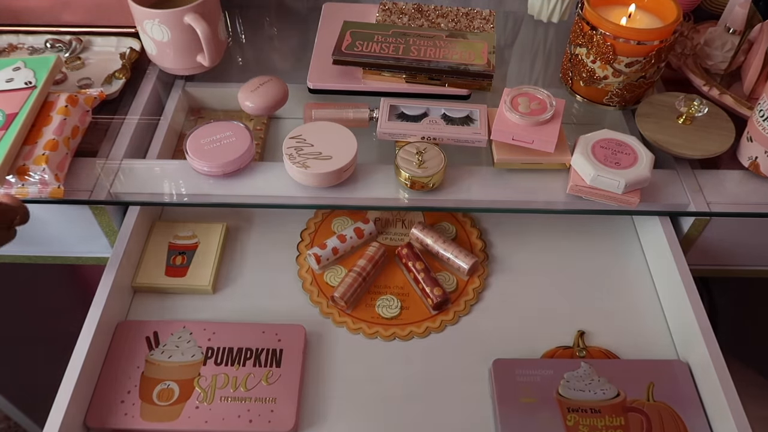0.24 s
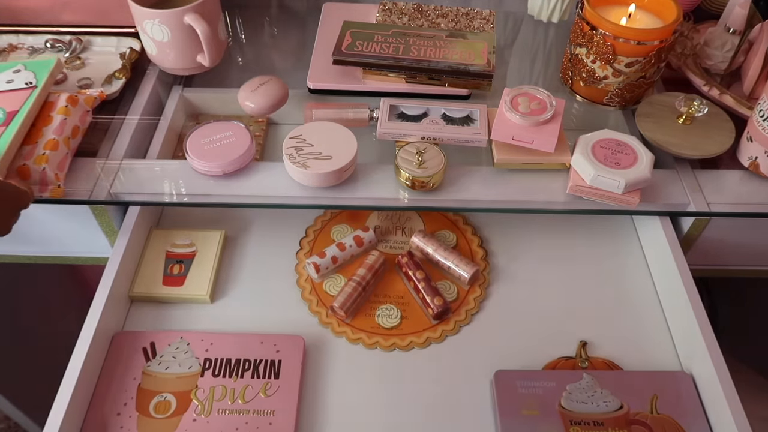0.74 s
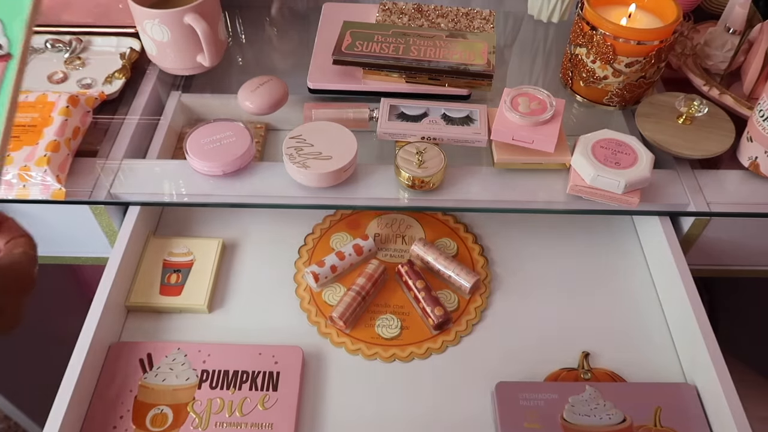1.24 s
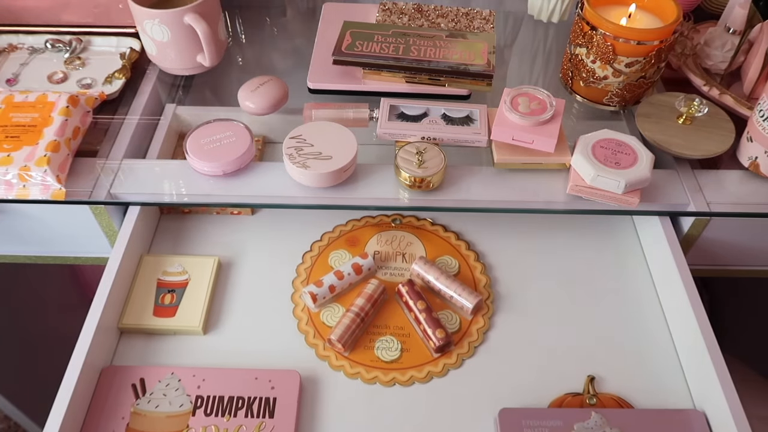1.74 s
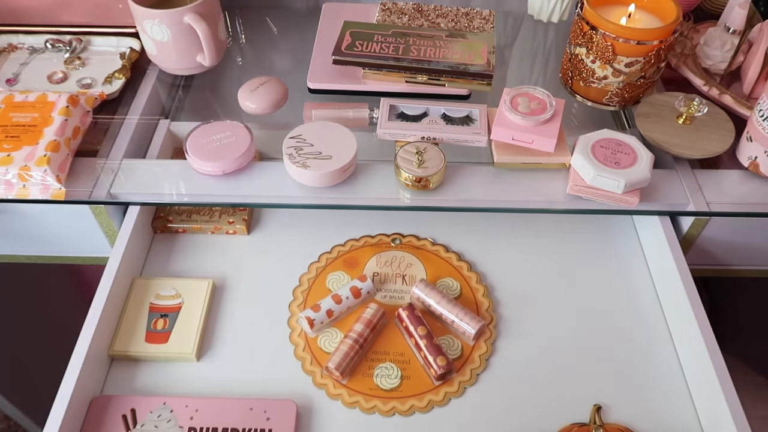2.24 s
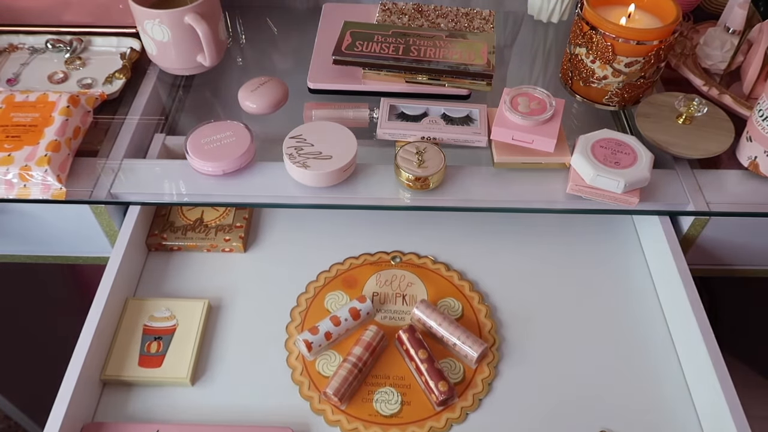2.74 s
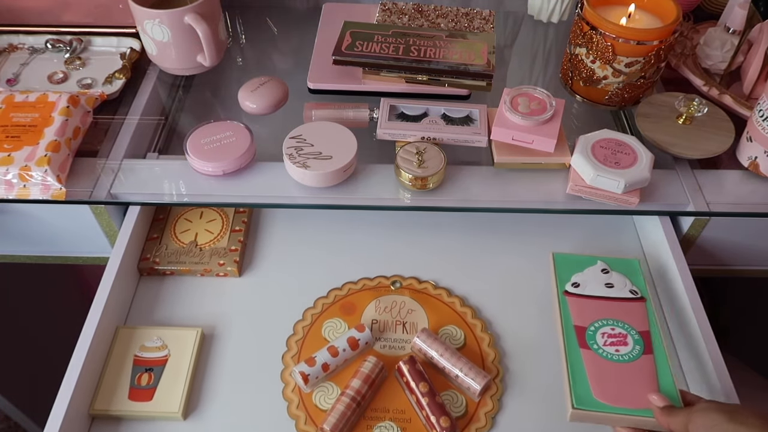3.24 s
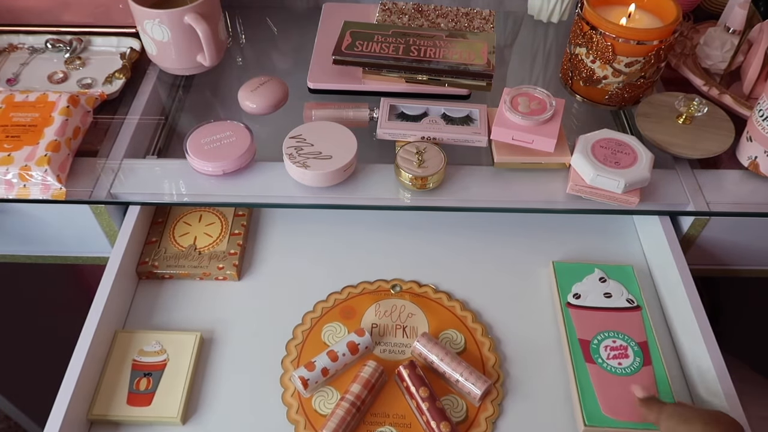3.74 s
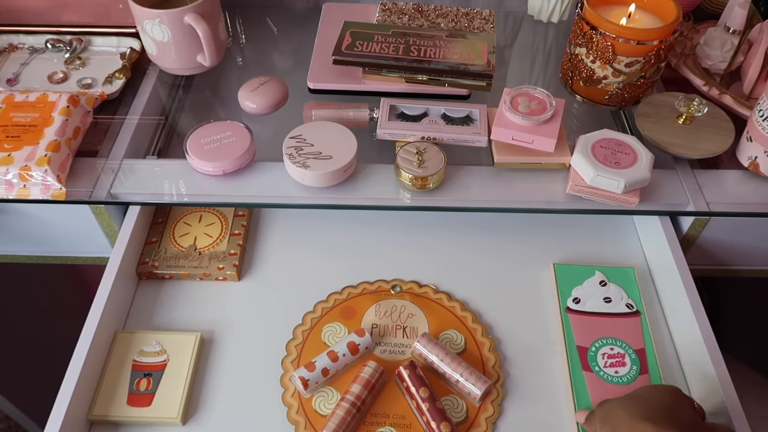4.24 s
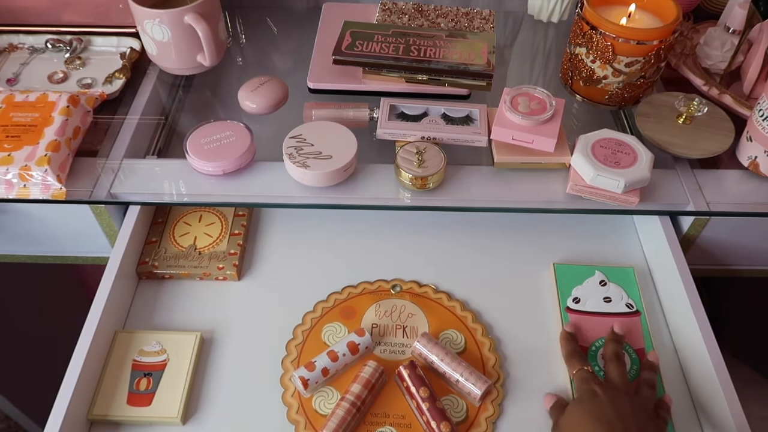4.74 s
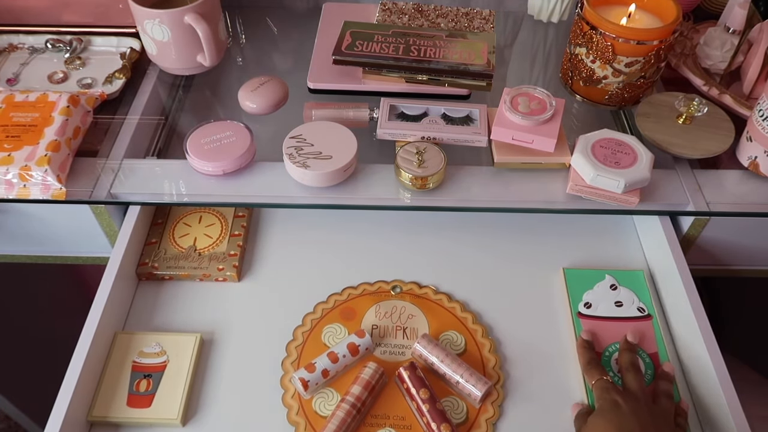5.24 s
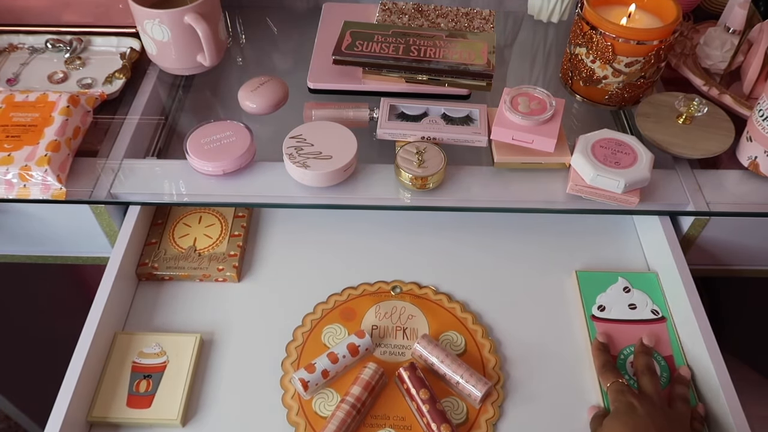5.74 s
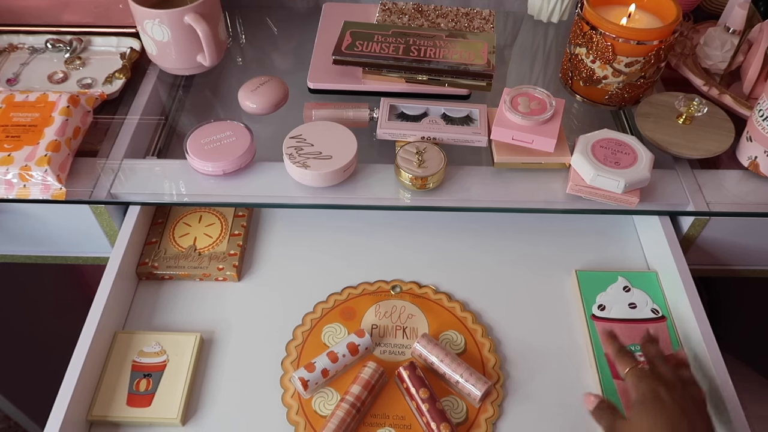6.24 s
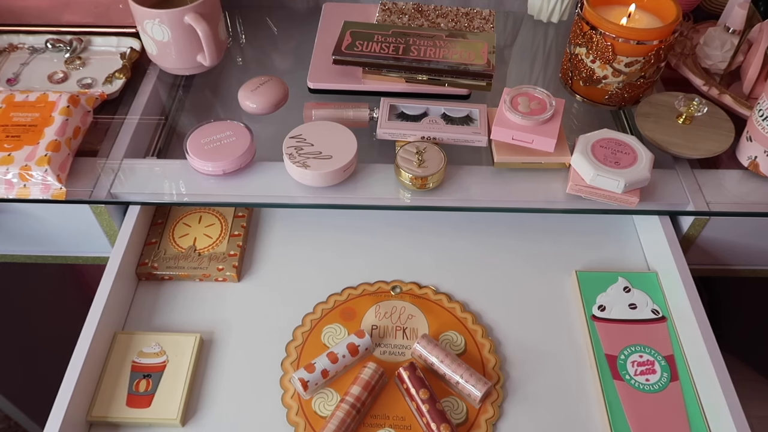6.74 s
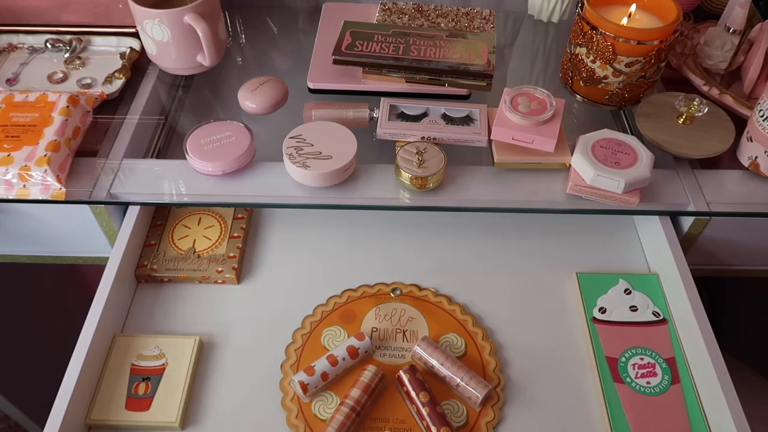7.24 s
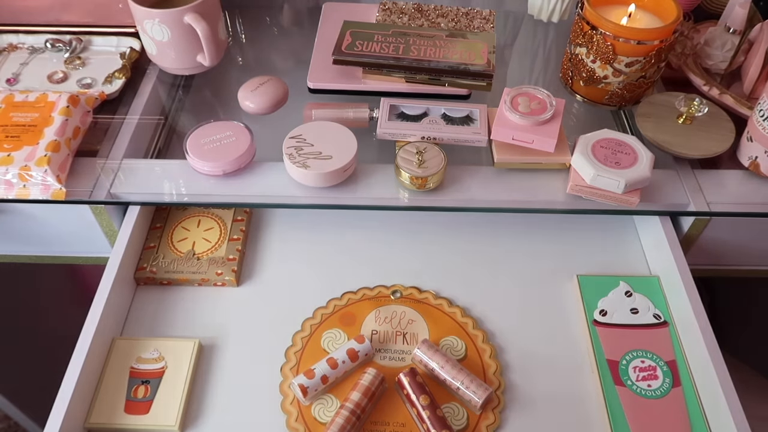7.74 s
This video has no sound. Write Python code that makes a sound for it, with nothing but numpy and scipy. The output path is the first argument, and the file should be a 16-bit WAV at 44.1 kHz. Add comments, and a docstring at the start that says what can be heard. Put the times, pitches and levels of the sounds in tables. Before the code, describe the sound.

Cardboard makeup palettes are set down and slid in a wooden drawer, with light taps, two louder clattering knocks and faint rubbing.

```python
"""Flat cardboard palettes are picked up, set down and pushed about in a wooden drawer.
Each impact excites the bending modes of the thin drawer bottom and cracks at the card's edge; heavy
landings also make the cabinet boom. Between the knocks, sliding fingers and card give friction noise.
The room is quiet and soft, with a low rumble. A small recorder with two close ports clips the
loudest blow and turns its gain down for a moment after it."""
import sys
import numpy as np
from scipy import signal
from scipy.fft import rfft, irfft
from scipy.io import wavfile
from scipy.ndimage import uniform_filter1d, minimum_filter1d

SR = 44100
rng = np.random.default_rng(int(sys.argv[2]) if len(sys.argv) > 2 else 0)


def log_audio(samples):
    """Write samples as a 16-bit WAV file to the path given in sys.argv[1]."""
    # one column per channel
    frames = np.atleast_2d(samples).T
    # limit to full scale, then quantise
    limited = np.clip(frames, -1, 1)
    pcm = np.round(limited * 32767).astype(np.int16)
    wavfile.write(sys.argv[1], SR, pcm)


N = 352396

# Spectral density of the background noise: f/Hz, relative level/dB
BACKGROUND_SPECTRUM = [(12, -38), (20, -10), (76, 1), (136, -6.5), (250, -6), (321, -7.5), (698, -18),
                       (1650, -23), (1840, -23.5), (2500, -26.5), (3900, -30), (5290, -33), (11500, -44),
                       (14000, -44.5), (15200, -64)]
# Correlation of the background between the ports: f/Hz, coefficient
PORT_CORRELATION = [(60, 1), (150, 0.92), (380, 0.099), (940, 0), (2350, 0), (5890, 0.23), (14800, 0.82)]
# Ebb of the low rumble: t/s, relative level/dB
RUMBLE_EBB = [(0, 2), (3.2, 2), (5.001, -1), (7.001, -1.4), (7.99, -4)]
# Strokes of card and fingers: peak t/s, level/dB, time to swell or fade by 10 dB/s, tilt/(dB/octave)
# (times below 0.01 s count as 0.01 s)
STROKES = [(.24, -49, .13, -6.5), (1.19, -64.5, 0.7, -0.5), (1.45, -53, 0.32, -6), (1.85, -67, -0.2, -2),
           (2.24, -50.5, .065, -9), (2.37, -62, 0.06, -2), (2.45, -48.5, 0.1453, -4),
           (2.95, -53, -0.85, -12), (3.93, -57.5, 0.1, 2), (4.1, -66, 0.27, -3), (4.24, -60, 0.68, -6),
           (5.05, -60.5, -0.87, -3.5), (5.39, -57, 0.3, -5.5), (5.63, -49.5, 0.05, -3),
           (6.56, -61, 0.1, -2), (6.95, -58, -0.14, -4), (7.26, -50.5, 0.2, -4.5), (7.63, -52.5, 0.12, -7),
           (7.81, -67.5, 0.5, 6), (7.98, -55, -0.8, -4.5)]
# Spectral density of the friction noise: f/Hz, relative level/dB
FRICTION_SPECTRUM = [(150, -16), (400, -6.5), (1000, -1.5), (1900, 2), (3000, -2), (5000, -5), (14000, -15)]
# Impacts: t/s, peak level/dB, favoured f/Hz, crack level re knock/dB, crack tilt/(dB/octave), rise time/s
IMPACTS = [(1.032, -36.5, 244, -7.5, -5, .0073), (1.169, -28.5, 890, -8.5, 4.5, 0.0031),
           (2.102, -35, 480, -13, 3.5, .0045), (2.117, -29.5, 243, -32, -2, 0.0045),
           (2.287, -34.5, 820, -5, 3, .0017), (2.384, -28, 326, -3, 1, 0.0065),
           (2.4, -28, 640, 1.5, -0.5, 0.00091), (2.479, -42, 290, -0.5, 4, 0.0019),
           (2.740, -35.5, 333, -15, 2, 0.0025), (2.796, -43, 330, -22.5, -6, 0.0033),
           (3.553, -8.5, 430, -4.5, -2, 0.00051), (3.558, -15.5, 330, -14, -0.5, 0.0021),
           (3.566, -15.5, 353, -7.5, 0, 0.00058), (3.753, -8.5, 470, -5, 0.5, 0.00064),
           (3.778, -16.5, 594, -4, 1, 0.0014), (3.803, -21.5, 594, -9, 0.5, 0.0011),
           (3.869, -23.5, 520, 1, 1.5, 0.00019), (4.008, -29, 400, -6, -2.5, 0.00048),
           (4.031, -32, 460, -9, -1, 0.0012), (4.067, -34, 1600, 3.5, 0, .0004),
           (4.278, -30, 480, -3.5, 0, .001), (4.292, -22.5, 889, 6, 4, .0024),
           (4.296, -7, 418, -3, 2, 0.00011), (4.306, 3, 340, -7.5, 1, .0005),
           (4.323, -15, 397, -4, 1, .0009), (4.34, -20.5, 381, -11, 5, .002),
           (4.525, -41.5, 1302, -5, -0.5, .0008), (5.587, -40, 400, -11, 3, 0.018),
           (5.824, -22, 368, -16.5, -2.5, 0.0016), (5.85, -38, 395, -27, 4, 0.0015),
           (6.481, -38, 357, -34, 0, 0.0053), (6.528, -43.5, 393, 2, 2.5, 0.0021),
           (6.705, -26, 230, -15.5, -7.5, 0.013), (6.861, -38.5, 242, -36, 3, .0051),
           (6.941, -33.5, 217, -12.5, -3.5, 0.0091), (6.964, -37, 293, -14, -4, 0.0065),
           (7.158, -39.5, 261, -31, -13, 0.0028), (7.206, -42.5, 298, -8, -8, 0.0025),
           (7.280, -41, 490, -2.5, 4, 0.0052)]
# Modes of the drawer bottom: f/Hz, relative level/dB, T60/s
DRAWER_MODES = [(185, -0.5, 0.13), (260, -11, 0.029), (317, -8.5, 0.085), (373.7, 2, 0.045),
                (463, -9, 0.051), (575, -8.5, 0.038), (642, -14, 0.093), (847, -10, 0.045),
                (943, -10.5, 0.036), (990, -9, 0.012), (1227, -10, 0.045), (1332, -12.5, 0.05),
                (1665, -7, 0.017), (1825, -11.5, 0.026), (1760, -17, .03), (2320, -20.5, 0.028),
                (2900, -11, .03), (3345, -15, .03)]
# Spectral density of the edge crack: f/Hz, relative level/dB
CRACK_SPECTRUM = [(530, -37), (900, -0.5), (1720, -9), (2750, -16), (3530, -18.5), (4160, -25),
                  (4570, -26.5), (11400, -43.5), (15000, -47)]
# Landings whose weight shakes the cabinet: t/s, peak level/dB
LANDINGS = [(3.553, -21), (3.756, -31), (4.295, -24.5), (4.305, -17.5)]
# Difference between the ports: f/Hz, side level re mid/dB
PORT_DIFFERENCE = [(100, -33), (500, -43.5), (1500, -16.5), (4000, -6), (8000, 3), (13000, 6.5)]
# Spectrum returned by the walls: f/Hz, relative level/dB
WALL_SPECTRUM = [(100, 0), (400, -4.5), (1200, 0), (3000, -2), (12000, 2.5)]
# Reverberation time of the room: f/Hz, T60/s
REVERB_TIMES = [(60, 0.37), (250, 0.27), (1000, 0.22), (4000, 0.22), (14000, 0.25)]


def from_db(db):
    """Amplitude ratio of a level in decibels."""
    return 10 ** (np.asarray(db) / 20)


def unit_rms(x):
    """Normalisation to a root mean square of 1."""
    return x / np.sqrt(np.mean(x ** 2) + 1e-20)


def at_hz(table, hz):
    """Interpolation of a table on a logarithmic frequency axis."""
    table_hz, values = np.transpose(table)
    return np.interp(np.log(hz), np.log(table_hz), values)


def drift(corner_hz):
    """Slow random fluctuation: low-passed noise with an rms near 1."""
    step, run_in = 40, 2000
    pole = np.exp(-2 * np.pi * corner_hz * step / SR)
    noise = rng.standard_normal(N // step + run_in + 2)
    slow = signal.lfilter([1], [1, -2 * pole, pole * pole], noise)[run_in:]
    return np.interp(np.arange(N) / step, np.arange(len(slow)), unit_rms(slow))


def resonator(force, hz, t60):
    """Damped harmonic oscillator: a unit impulse starts a decaying sine of amplitude about 1."""
    decay, angle = from_db(-60 / (t60 * SR)), 2 * np.pi * hz / SR
    return signal.lfilter([0, np.sin(angle)], [1, -2 * decay * np.cos(angle), decay ** 2], force + 1e-18)


def bands(pair):
    """Half-octave filter bank: yields (centre f/Hz, band), taking the two input rows in turn."""
    edges = 20 * 2 ** np.arange(0, 10, .5)
    for k, (low, high) in enumerate(zip(edges, edges[1:])):
        bandpass = signal.butter(2, [low, high], "band", fs=SR, output="sos")
        yield np.sqrt(low * high), signal.sosfilt(bandpass, pair[k % 2])


def background_noise():
    """Partial coherence: house rumble and microphone hiss, most alike at the two ports in the bass."""
    level_db, rumble_top_hz = -49, 220
    ebb_db = np.interp(np.arange(N) / SR, *np.transpose(RUMBLE_EBB))
    out = 0
    for hz, (mid, side) in bands(rng.standard_normal((2, 2, N))):
        alike = np.clip(at_hz(PORT_CORRELATION, hz), -1, 1)
        band_db = at_hz(BACKGROUND_SPECTRUM, hz) + 0.82 * drift(12)
        gain = from_db(band_db + ebb_db / (1 + (hz / rumble_top_hz) ** 2))
        out = out + gain * (np.sqrt(1 + alike) * mid + np.sqrt(1 - alike) * side * [[1], [-1]])
    return from_db(level_db) * unit_rms(out)


def card_rubbing():
    """Sliding friction: dense uneven slips of card on paint, coloured by the grip of all strokes, each weighed
    by its loudness."""
    t = np.arange(N) / SR
    envelope, weighted_tilt = np.full(N, 1e-9), np.zeros(N)
    for peak_s, db, fade_s, stroke_tilt in STROKES:
        stroke = from_db(db - 10 * np.abs(t - peak_s) / max(fade_s, .01))
        envelope += stroke
        weighted_tilt += stroke * stroke_tilt
    tilt = weighted_tilt / envelope
    slips = rng.standard_normal((2, N)) * from_db(0.95 * drift(90) + 0.73 * drift(16))
    out, grip_from_hz = 0, 1100
    for hz, band in bands(slips):
        if hz > 150:
            grip_db = tilt * np.log2(max(hz, grip_from_hz) / 2000)
            out = out + from_db(at_hz(FRICTION_SPECTRUM, hz) + grip_db) * band
    return envelope * out


def drawer_bottom(force, favoured_hz, crack_db):
    """Modal superposition: a contact drives most the modes near a pitch set by its size and place."""
    # a padded contact, with little crack, reaches fewer modes
    reach_octaves = min(0.58 * from_db(0.36 * (crack_db + 10)), .75)
    variations = from_db(rng.normal(0, 1.7, len(DRAWER_MODES)))
    vibration = 0
    for (hz, db, t60), variation in zip(DRAWER_MODES, variations):
        weight = from_db(db - 5.3 * (np.log2(hz / favoured_hz) / reach_octaves) ** 2)
        vibration = vibration + weight * variation * resonator(force, hz, t60)
    radiation = signal.butter(2, 334, "high", fs=SR)  # a small panel radiates little deep bass
    return signal.lfilter(*radiation, vibration)


def edge_crack(t, chatter_envelope, rise_s, tilt):
    """Broadband contact transient: a snap, weaker for a softer contact, and then the card's chatter."""
    size, lead = len(t), 64  # the lead leaves room for the filter's pre-ringing
    hz = np.arange(1, size // 2 + 2) * SR / size
    snap = 0.00013 / rise_s * np.exp(-t / 0.00048)
    grit = rng.standard_normal(size) * (chatter_envelope + snap)
    colour = from_db(at_hz(CRACK_SPECTRUM, hz) + tilt * np.log2(hz / 1000))
    crack = irfft(rfft(np.roll(grit, lead)) * colour, size)
    return np.roll(crack, -lead) * (t < .2)


def knocks():
    """Impact excitation: a force pulse and its dying chatter sound the drawer bottom and the edge."""
    longest_settle_s, halved_at_db, span_db = .028, -24.5, 24.5
    size = SR // 4
    t, out = np.arange(size) / SR, np.zeros(N + size)
    for start_s, db, favoured_hz, crack_db, tilt, rise_s in IMPACTS:
        looseness = 1 / (1 + 2 ** ((db - halved_at_db) / span_db))  # a harder blow seats the card sooner
        settle_s = max(longest_settle_s * looseness, .001)
        chatter_envelope = np.exp(-t / settle_s) * (1 - np.exp(-t / rise_s))
        chatter = 0.14 * looseness * rng.standard_normal(size) * chatter_envelope
        pulse = t * np.exp(-t / (.0001 + 0.098 * rise_s))  # soft contacts push longer
        body = drawer_bottom(pulse / pulse.sum() + chatter, favoured_hz, crack_db)
        crack = edge_crack(t, chatter_envelope, rise_s, tilt)
        knock = body / np.abs(body).max() + from_db(crack_db) * crack / np.abs(crack).max()
        start = round(start_s * SR)
        out[start:start + size] += from_db(db) * knock
    return out[:N]


def cabinet_thumps():
    """Resonance: one low cabinet mode booms briefly under heavy landings and radiates little below it."""
    mode_hz, t60_s = 88.6, 0.12
    t, blows = np.arange(SR // 2) / SR, np.zeros(N)
    force = np.exp(-t / 0.0009) * np.cos(2 * np.pi * mode_hz * t)
    radiation = signal.butter(2, 65, "high", fs=SR, output="sos")
    thump = signal.sosfilt(radiation, resonator(force, mode_hz, t60_s))
    for start_s, db in LANDINGS:
        blows[round(start_s * SR)] = from_db(db)
    return signal.fftconvolve(blows, thump / np.abs(thump).max())[:N]


def at_ports(x):
    """Diffraction: the recorder's body shadows and scatters short waves, so the ports differ in treble."""
    hz = np.arange(1, len(x) // 2 + 2) * SR / len(x)
    phase_walk = np.cumsum(rng.uniform(0, 2, 24) * np.arange(24) / 8)
    phase = np.interp(hz, np.linspace(0, SR / 2, 24), phase_walk)
    scatter = 1j * np.sqrt(2) * np.cos(phase)
    side = irfft(rfft(x) * from_db(at_hz(PORT_DIFFERENCE, hz)) * scatter, len(x))
    return np.array([x + side, x - side])


def reverberation(x):
    """Diffuse reflection: dense echoes decay exponentially band by band, nearly alike at both ports."""
    t = np.arange(SR // 2) / SR
    build_up = 1 - np.exp(-t / 0.0058)
    echoes = build_up * sum(from_db(at_hz(WALL_SPECTRUM, hz) - 60 * t / at_hz(REVERB_TIMES, hz)) * band
                            for hz, band in bands(rng.standard_normal((2, 2, len(t)))))
    mid, side = echoes / np.sqrt(np.sum(echoes[0] ** 2))
    side = from_db(-6) * signal.lfilter([1, -1], [1, -.6], side)  # the bass is common to both ports
    return signal.fftconvolve(x[None], np.array([mid + side, mid - side]), axes=1)[:, :N]


def scene():
    """Superposition of the direct sound, its reverberation and the background noise."""
    handling = knocks() + cabinet_thumps() + card_rubbing()
    return at_ports(handling) + from_db(-10.5) * reverberation(handling) + background_noise()


def record(dry):
    """Automatic gain control and saturation: gain dips after loud blows; peaks clip; the top is cut."""
    threshold_db, cut_share, hold_s, release_db_per_s, smooth_s = -14, 0.82, 0.3, 20.5, 0.095
    ceiling, cutoff_hz = .98, 15300
    power = uniform_filter1d(np.mean(dry ** 2, axis=0), size=SR // 100)
    cut_db = cut_share * np.maximum(10 * np.log10(power + 1e-12) - threshold_db, 0)
    hold = int(hold_s * SR)
    held_db = -minimum_filter1d(-cut_db, size=hold, origin=(hold - 1) // 2, mode="nearest")
    ramp_db = release_db_per_s * np.arange(N) / SR
    released_db = np.maximum.accumulate(held_db + ramp_db) - ramp_db
    pole = np.exp(-1 / (smooth_s * SR))
    ducked = dry * from_db(-signal.lfilter([1 - pole], [1, -pole], released_db))
    clipped = ducked / (1 + np.abs(ducked / ceiling) ** 4) ** .25
    return signal.sosfilt(signal.cheby2(16, 70, cutoff_hz, fs=SR, output="sos"), clipped)


dry = scene()
out = record(dry)
log_audio(out)
```